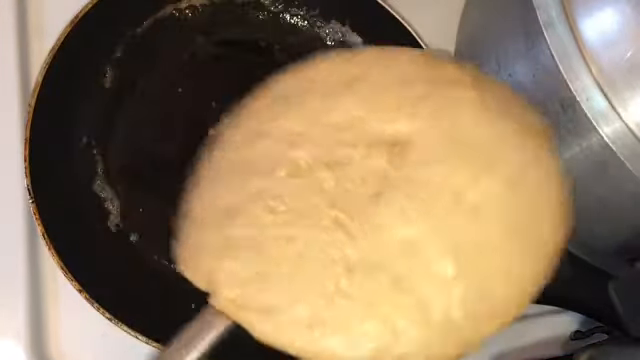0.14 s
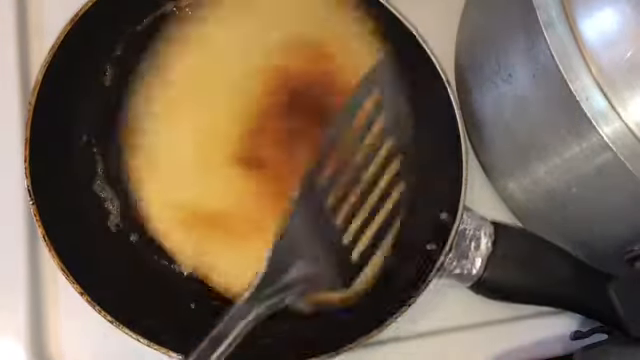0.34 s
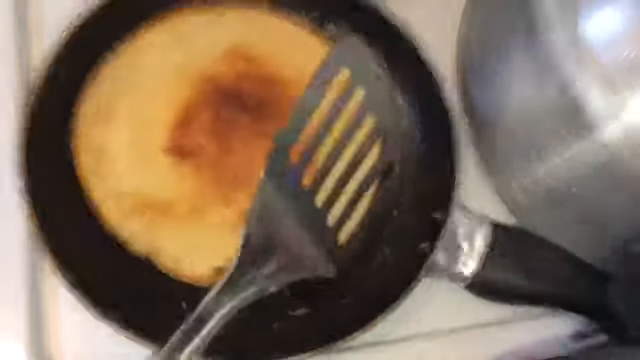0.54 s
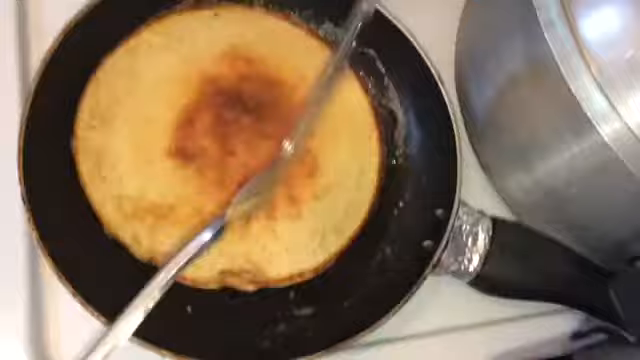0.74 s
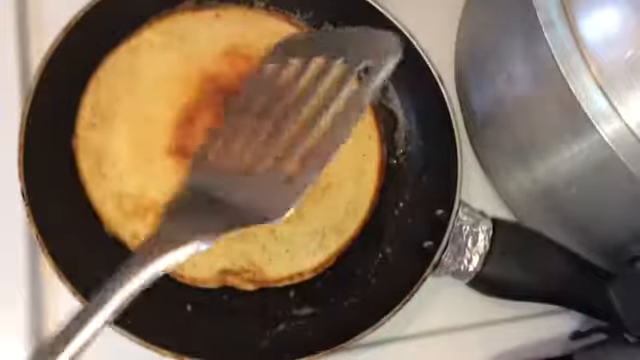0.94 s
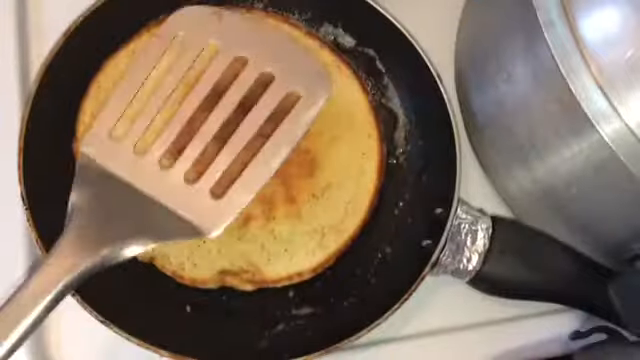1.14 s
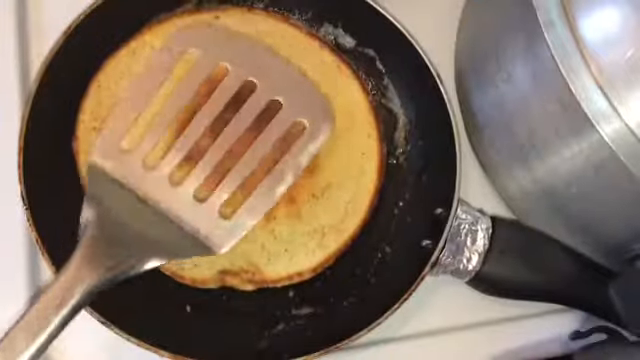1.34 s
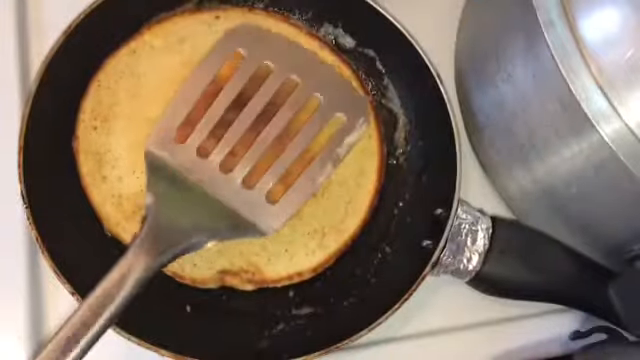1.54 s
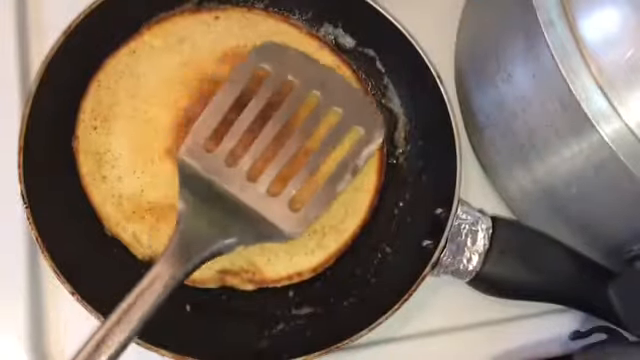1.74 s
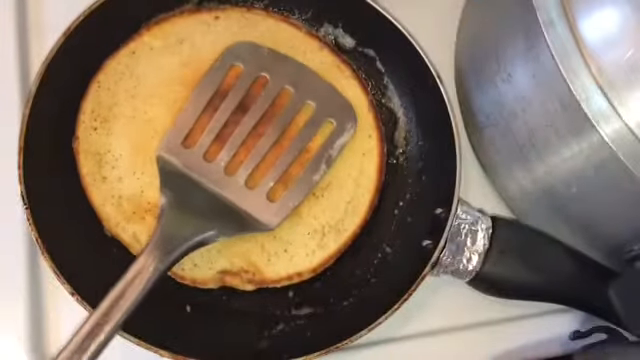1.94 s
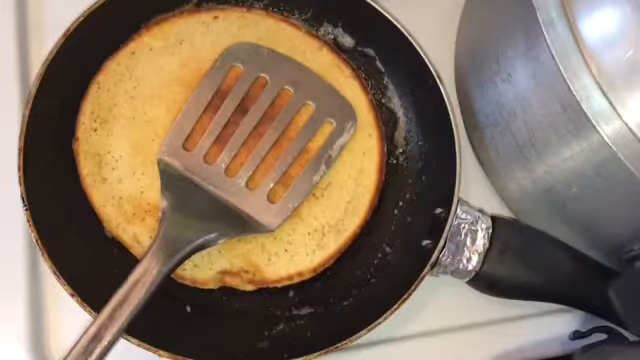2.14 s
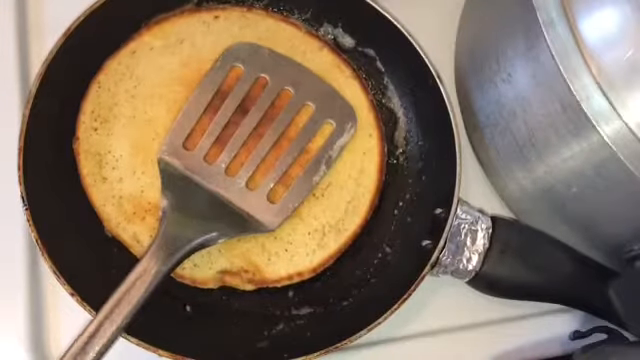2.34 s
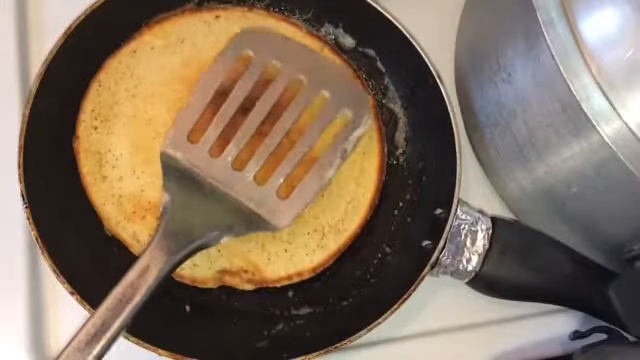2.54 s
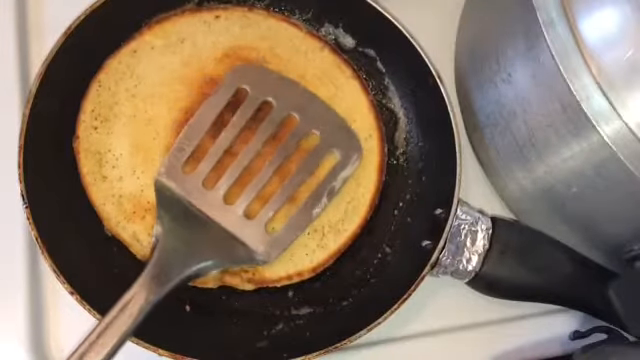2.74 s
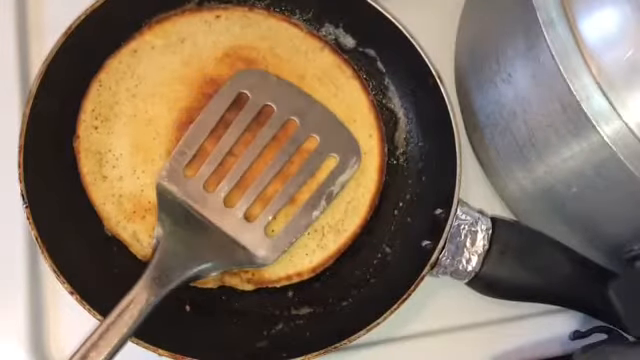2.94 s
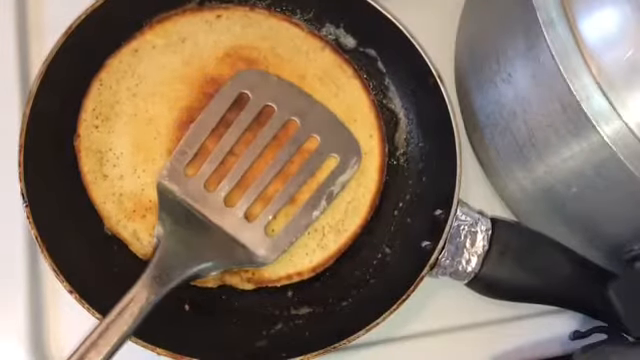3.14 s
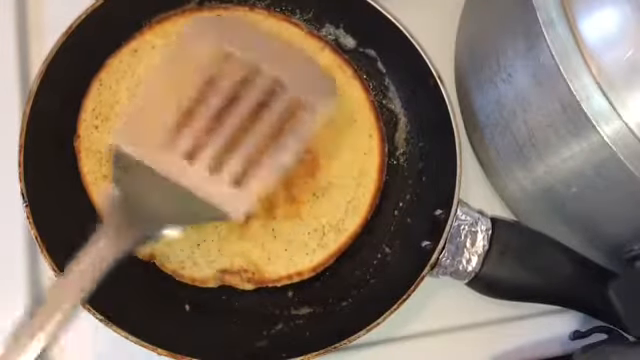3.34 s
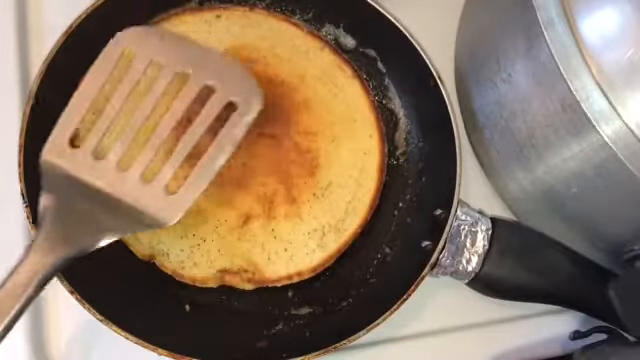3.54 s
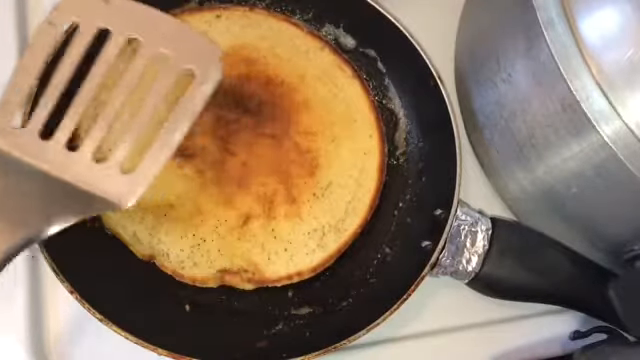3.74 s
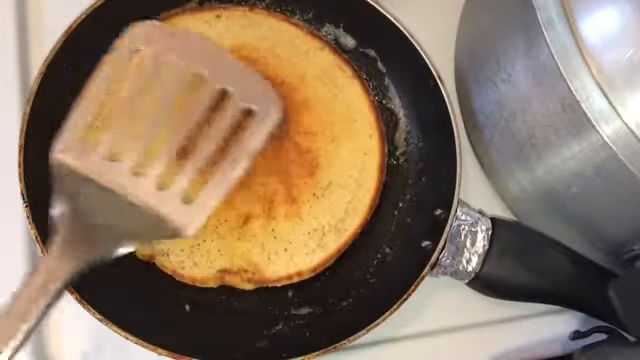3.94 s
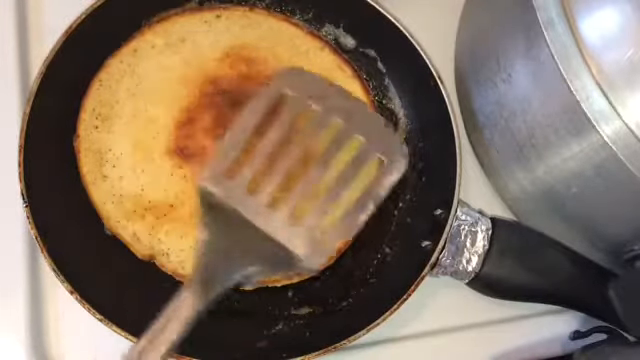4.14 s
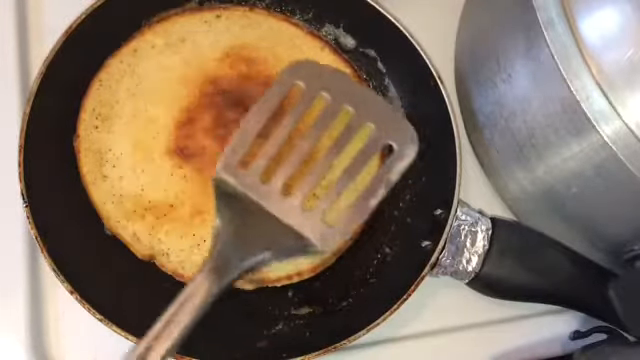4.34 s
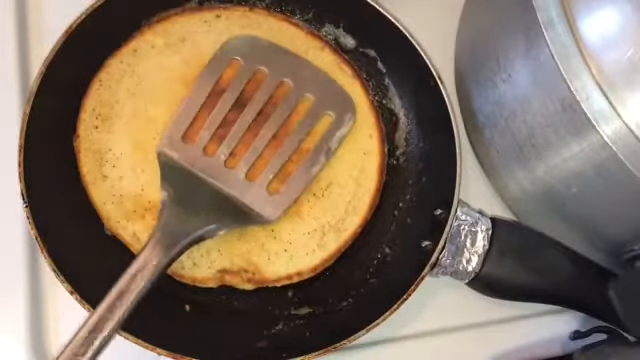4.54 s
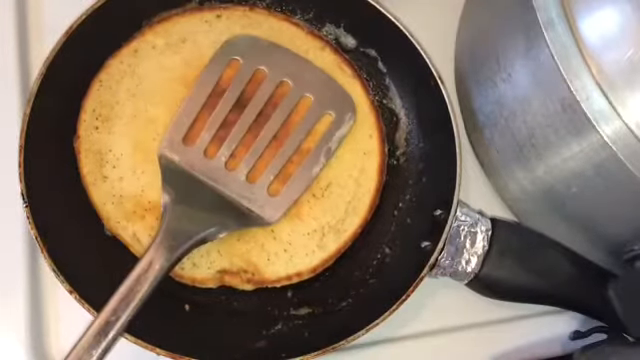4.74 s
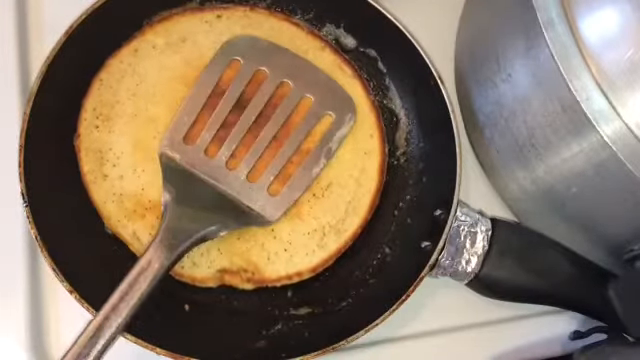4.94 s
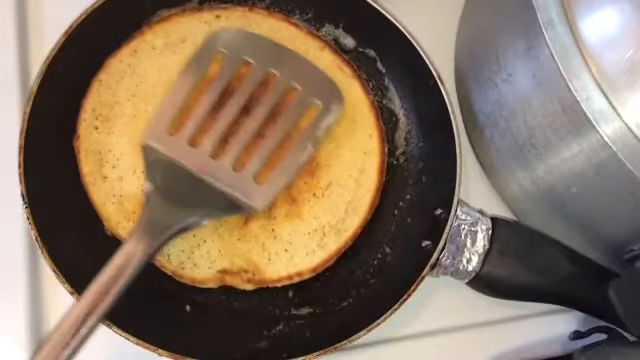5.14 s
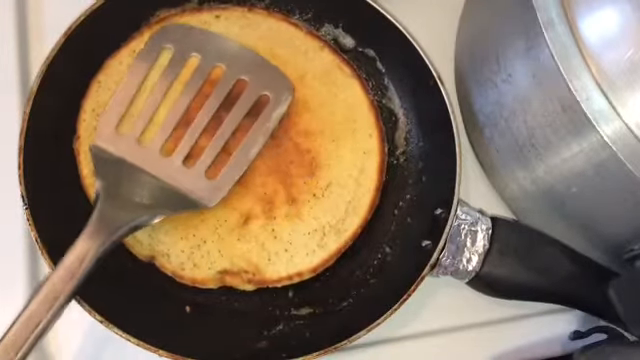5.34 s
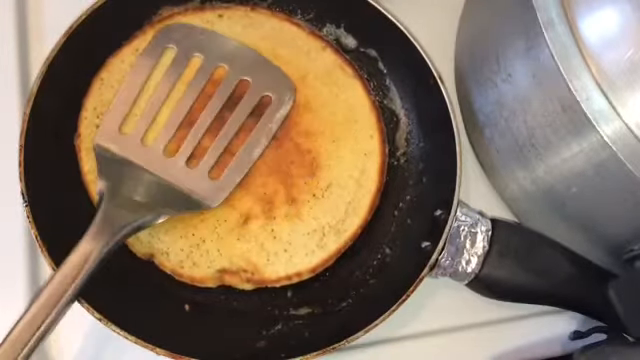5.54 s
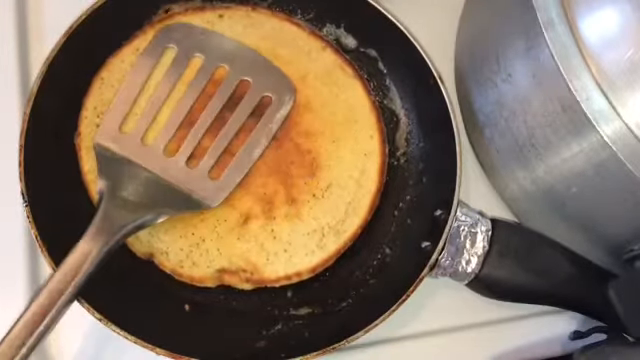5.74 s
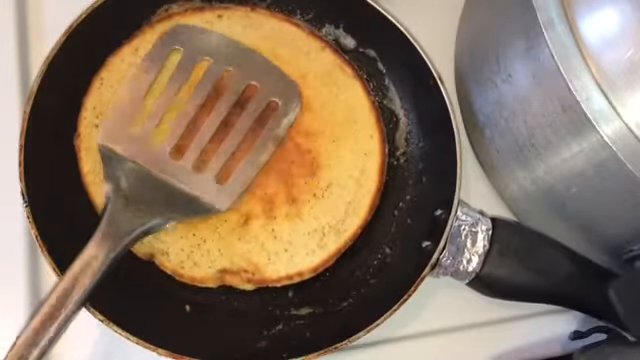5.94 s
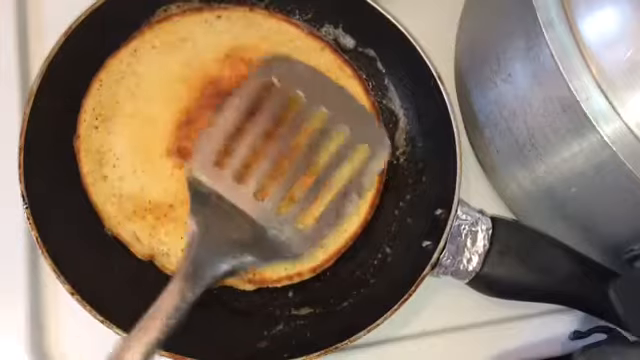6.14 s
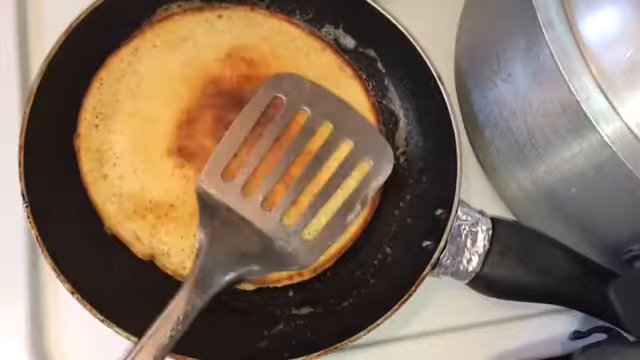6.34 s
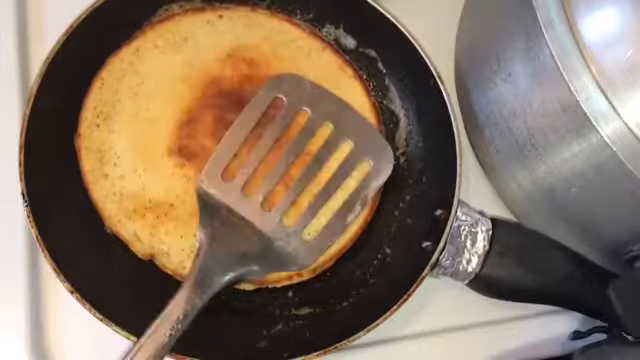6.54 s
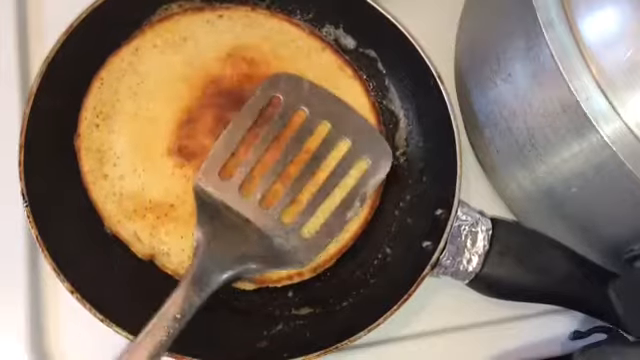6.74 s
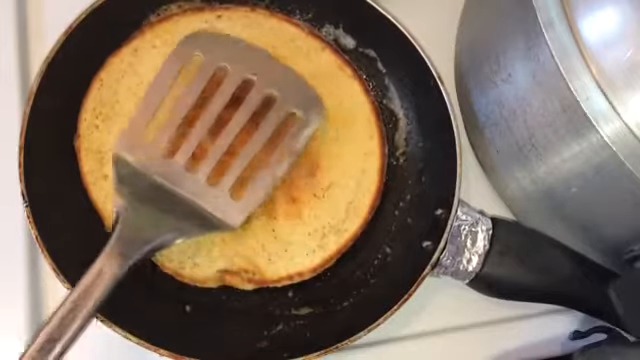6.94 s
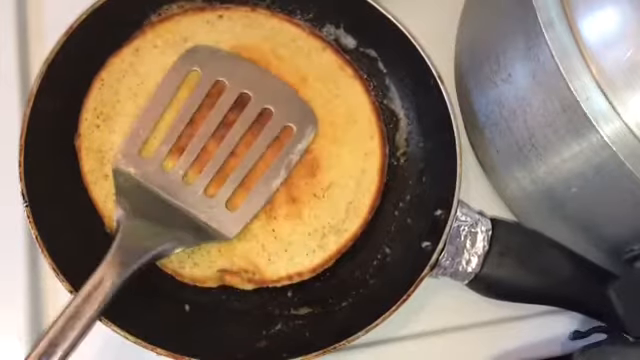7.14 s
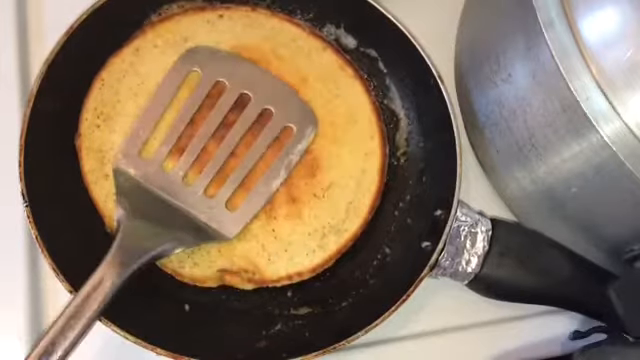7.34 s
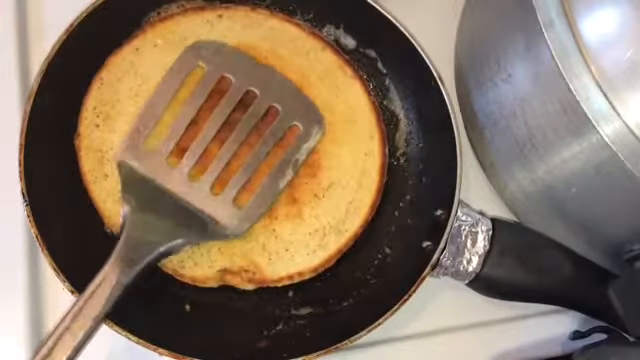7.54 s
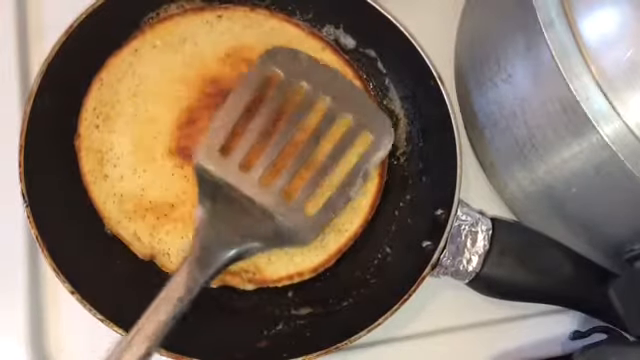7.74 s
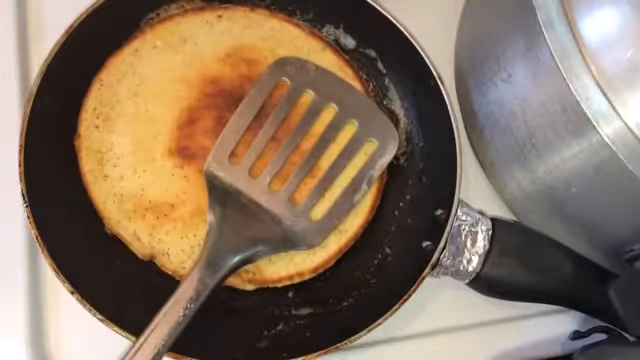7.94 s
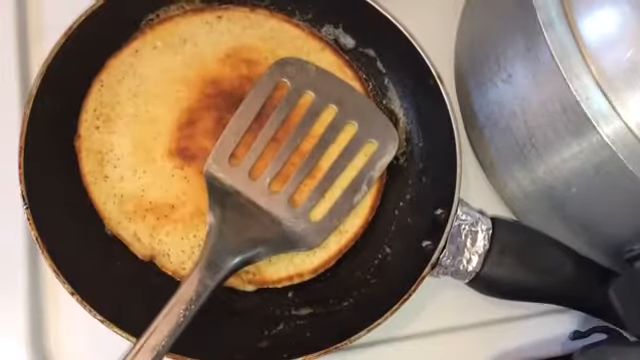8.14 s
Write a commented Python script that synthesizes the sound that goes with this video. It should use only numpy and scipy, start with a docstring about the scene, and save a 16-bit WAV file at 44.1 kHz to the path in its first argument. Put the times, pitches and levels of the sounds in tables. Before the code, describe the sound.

A pancake is flipped into a sizzling pan with a wet slap and metal clatter, then fries softly under spatula taps.

```python
"""A kitchen, close to a gas stove: a pancake is flipped in a non-stick pan and lands with a wet slap.
The pan clatters on its grate, and a slotted metal spatula pats and presses the cake, rocking the pan
and squeezing out steam. Bursting bubbles make the fresh batter sizzle and spit, then the frying settles.
Underneath, the flame rumbles softly and the gas jet whistles."""
import sys
import numpy as np
from scipy import signal
from scipy.fft import rfft, irfft
from scipy.io import wavfile

SR = 44100
rng = np.random.default_rng(int(sys.argv[2]) if len(sys.argv) > 2 else 0)


def master_out(mix):
    """Clip the mix to full scale and print it as 16-bit PCM to the path in sys.argv[1]."""
    frames = np.transpose(np.atleast_2d(mix))
    ceiling = np.clip(frames, -1, 1)
    pcm = np.round(ceiling * 32767).astype(np.int16)
    wavfile.write(sys.argv[1], SR, pcm)


N = 361380
TIME, FREQS = np.arange(N) / SR, np.fft.rfftfreq(N, 1 / SR)
WET_DB, DRY_DB = -51.5, -57.5  # how strongly wet and settled batter fry


def amp(db):
    """Turns decibels into a gain."""
    return 10 ** (np.asarray(db) / 20)


def unit(x):
    """Scales a signal to an average (rms) size of 1."""
    return x / np.sqrt(np.mean(x ** 2) + 1e-20)


def at_hz(points, hz):
    """Reads between rows of (frequency, value), on a scale of octaves."""
    f, value = np.transpose(points)
    return np.interp(np.log(hz + 1), np.log(f + 1), value)


def curve(points):
    """Joins rows of (time, value) with straight lines."""
    return np.interp(TIME, *np.transpose(points))


def add(mix, s, sound):
    """Mixes a sound in, starting at s seconds."""
    part = mix[max(round(s * SR), 0):][:len(sound)]
    part += sound[:len(part)]


def coloured(x, points):
    """Shapes a signal's bass and treble from rows of (frequency, level), at rms 1."""
    return unit(irfft(rfft(x) * amp(at_hz(points, FREQS)), N))


def drift(per_s):
    """Smooth random wandering; a higher per_s makes it quicker."""
    return unit(irfft(rfft(rng.standard_normal(N)) * np.exp(-(FREQS / per_s) ** 2), N))


def swell(t, rise_s, decay_s):
    """A level that grows to 1 at t = 0, then fades."""
    return np.exp(-abs(t) / np.where(t < 0, rise_s, decay_s))


def whistle(hz, width_hz):
    """Swirling gas stirs one resonance: noise gathered around a pitch."""
    band = 1 + ((FREQS - hz) / (width_hz / 2)) ** 2
    return unit(irfft(rfft(rng.standard_normal(N)) / band, N))


def burner():
    """The gas flame rushes and flutters, and its jet whistles faintly and unevenly."""
    # tone of the burner and kitchen background: f/Hz, level/dB
    rush_tone = [(20, -15), (45, -10.5), (65, -13), (88, 1), (115, -11), (148, 1), (175, -6.5),
                 (250, -18.5), (295, -6), (350, -19), (440, -11), (480, -20.5), (540, -8.5), (620, -21),
                 (850, -17.5), (1400, -21.5), (2300, -19), (3200, -29.5), (15000, -31)]
    # the flame's low flutter: t/s, level/dB
    flutter_levels = [(0, -67.5), (1.2, -64), (3, -62.5), (4.1, -67.5), (4.65, -56), (5.8, -83.5),
                      (6.5, -71), (8.19, -66)]
    # the jet's whistle: t/s, level/dB
    jet_levels = [(0, -70), (3.6, -72), (4.6, -67.5), (8.19, -69.5)]
    rush = amp(-62) * coloured(rng.standard_normal(N), rush_tone)
    waver_db = 3.5 * np.tanh(drift(7.8))
    jet = amp(curve(jet_levels) + waver_db) * whistle(hz=2080, width_hz=145)
    flutter = amp(curve(flutter_levels)) * whistle(hz=82, width_hz=30)
    return rush + flutter + jet


def splats():
    """Wet batter smacks the hot metal and throws a short spray."""
    # batter and oil hitting the pan: t/s, level/dB, rise/s, decay/s, centre/Hz, spread/octaves
    smacks = [(0.2494, -38.5, 0.0012, 0.055, 1880, 2.15), (0.276, -31.5, .011, 0.015, 4006, 2.1),
              (0.287, -28, 0.0041, 0.021, 1520, 1), (.289, -28.5, 0.0017, 0.029, 418, 1.7),
              (.298, -27, 0.0049, 0.025, 1136, 0.28), (0.355, -44, 0.00078, 0.013, 4900, 1.3),
              (0.408, -39, 0.001, 0.04, 1880, 2.1), (6.586, -54, .006, 0.0062, 6000, .5)]
    out, t = np.zeros(N), np.arange(SR // 4) / SR
    octave = np.log2(np.fft.rfftfreq(len(t), 1 / SR) + 1)
    for s, db, rise, decay, centre_hz, spread in smacks:
        band = 1 / (1 + ((octave - np.log2(centre_hz)) / spread) ** 2) ** 2
        spray = unit(irfft(rfft(rng.standard_normal(len(t))) * band, len(t)))
        envelope = np.minimum(t / rise, 1) * np.exp(-np.maximum(t - rise, 0) / decay)
        add(out, s, amp(db) * spray * envelope)
    return out


def frying(land_s=.25, land_db=-66, build_s=.22, dry_at_s=1.75, settle_s=.33):
    """Frying strength in dB: it builds as the cake lands, holds while the batter is wet, then settles."""
    # brief swells in the sizzle's loudness: peak t/s, boost/dB, half length/s
    swells = [(1.69, 3.5, 0.065), (2.09, 3, 0.04), (2.56, 1, 0.085), (3.9, 2.5, 0.03), (4.498, 1.8, 0.082),
              (6.579, 2.5, 0.066), (8.17, 1.5, 0.17)]
    building = (land_db - WET_DB) * np.exp(-np.maximum(TIME - land_s, 0) / build_s)
    settling = (DRY_DB - WET_DB) * (1 - np.exp(-np.maximum(TIME - dry_at_s, 0) / settle_s))
    swelling = sum(db * np.exp(-((TIME - s) / length) ** 2) for s, db, length in swells)
    return np.where(TIME < land_s, -100, WET_DB + building + settling + swelling)


def crackle(per_s, spread_db, pitches=14, decay_cycles=.82):
    """Tiny bubbles burst at random, each a very short ping of its own pitch and size."""
    out, t = np.zeros(N), np.arange(96) / SR
    count = max(int(per_s * N / SR / pitches), 1)
    for hz in np.geomspace(3500, 15000, pitches):
        when, luck = rng.random((count, 2)).T
        size = np.minimum(-np.log(1 - luck), 3.3)  # many small, few large
        clicks = np.bincount((when * N).astype(int), amp(spread_db * size), N)
        ping = np.sin(2 * np.pi * hz * t) * np.exp(-t * hz / decay_cycles)
        out += np.convolve(clicks, ping)[:N] * np.sqrt(hz)
    return unit(out)


def sizzle(fresh_db=-48, settled_db=-57):
    """A wash of countless bubbles with clusters of nearer snaps on top; livelier frying is brighter."""
    # fizz of fresh batter: f/Hz, level/dB
    fresh_tone = [(500, -8), (2000, -16), (4200, -15), (5500, -5), (7000, 3), (9500, -4), (13000, 3.5),
                  (15500, -1.5)]
    # fizz of settled batter: f/Hz, level/dB
    settled_tone = [(500, -6), (1500, -5), (2800, -3), (4400, -8.5), (5500, -1), (6500, 2), (9500, -3),
                    (12500, 0.5), (15500, -3)]
    level_db = frying() + .3 * drift(3.2)
    flicker = drift(33)
    fizz, snaps = crackle(per_s=1300, spread_db=6.5), crackle(per_s=150, spread_db=6)
    wash = amp(1.5) * rng.standard_normal(N) + amp(-5) * fizz
    clusters = unit(snaps * amp(3 * np.tanh(flicker)))
    bubbles = wash * amp(1.38 * flicker) + amp(-6) * clusters
    fresh = np.clip((level_db - settled_db) / (fresh_db - settled_db), 0, 1)
    blend = fresh * coloured(bubbles, fresh_tone) + (1 - fresh) * coloured(bubbles, settled_tone)
    return amp(level_db + 2.5) * blend


def small_pops(wet_per_s=32, dry_per_s=6, above_frying_db=24.5):
    """Smaller random bubbles that follow the frying in rate and size: rows of t/s, level/dB, f/Hz."""
    level_db = frying()
    wet = np.clip((level_db - DRY_DB) / (WET_DB - DRY_DB), 0, 2)
    per_s = dry_per_s + wet * (wet_per_s - dry_per_s)
    at = np.flatnonzero(rng.random(N) < per_s / SR)
    size, pitch = rng.standard_normal((N, 2))[at].T
    return list(zip(TIME[at], level_db[at] + above_frying_db + 2 * size, 10700 * 2 ** (.14 * pitch)))


def pops(decay_cycles=.77, lead_s=.006):
    """A bubble of fat fizzes open, snaps and throws a brief spit."""
    # the largest bursting bubbles: t/s, level/dB, f/Hz
    big_pops = [(1.0675, -20, 11160), (1.1813, -20, 9000), (1.4702, -19.5, 11300), (1.5117, -17.5, 9900),
                (1.5796, -22, 10400), (1.6042, -19.5, 10100), (1.6085, -18.5, 9500), (1.671, -16.5, 8900),
                (1.6817, -18, 10900), (1.7233, -13, 9800), (1.74, -18, 9050), (1.769, -21, 12100),
                (1.7817, -20, 9850), (1.8144, -22.5, 9430), (1.8776, -21, 11200), (2.084, -20.5, 11700),
                (2.2296, -23.5, 9900), (2.4865, -23.5, 7400), (2.615, -20, 9700), (2.8158, -21.5, 9100),
                (3.0338, -24, 8100), (3.3602, -17.5, 10500), (3.5475, -27.5, 6160), (3.5971, -19.5, 10800),
                (4.5494, -27.5, 10100), (4.7542, -27.5, 10700), (5.2939, -29.5, 10300),
                (5.411, -31.5, 7000), (5.6389, -21, 7140), (5.7392, -25.5, 8100), (6.0455, -23, 11500),
                (6.5876, -27, 10000), (7.472, -27.5, 10950), (7.729, -26, 10900), (7.7786, -24.5, 9820)]
    out, t = np.zeros(N), np.arange(640) / SR - lead_s
    for s, db, hz in big_pops + small_pops():
        cycles = hz * np.maximum(t, 0)
        snap = np.sin(2 * np.pi * cycles) * np.exp(-cycles / decay_cycles) * (1 - np.exp(-2 * cycles))
        bright_noise = np.diff(rng.standard_normal(len(t) + 1)) / 2
        spit = bright_noise * swell(t, rise_s=.00054, decay_s=.001436)
        add(out, s - lead_s, amp(db - 1) * (snap / abs(snap).max() + amp(-17) * spit))
    return out


def thumps():
    """The falling cake traps a cushion of air, and the stove top booms under heavy blows."""
    # heavy pushes of cake and pan on the stove: t/s, level/dB, f/Hz, rise/s, decay/s
    pushes = [(.269, -17.5, 164, .007, 0.017), (0.29, -5.5, 169, 0.0027, 0.011),
              (.447, -18.5, 88.7, 0.0089, 0.038), (.487, -17, 88.5, .008, 0.039),
              (0.582, -23, 88.5, .01, 0.055), (0.832, -25, 156.2, .005, 0.034),
              (1.132, -24.5, 170.7, 0.004, 0.03), (5.53, -36, 160, 0.0098, .022)]
    out, t = np.zeros(N), np.arange(SR // 2) / SR
    for s, db, hz, rise, decay in pushes:
        envelope = np.exp(-t / decay) * (1 - np.exp(-t / rise))
        add(out, s, -amp(db) * np.sin(2 * np.pi * hz * t) * envelope)
    return signal.lfilter(*signal.butter(2, 55, "high", fs=SR), out)


def kitchen_ring(time_scale, size=16384):
    """The stove top and kitchen ring on as a blur of noise, the treble dying first."""
    # how long they ring at time_scale 1: f/Hz, time to fade by 60 dB/s
    ring_times = [(100, 0.7), (260, 0.284), (700, 0.42), (1800, 0.24), (5000, 0.25), (15000, 0.18)]
    hz, t, bands = signal.stft(rng.standard_normal(size), SR, nperseg=256)
    fade_s = time_scale * at_hz(ring_times, hz)[:, None]
    equal_energy = np.sqrt(2 * np.log(1000) / (fade_s * SR))
    return signal.istft(bands * amp(-60 * t / fade_s) * equal_energy, SR, nperseg=256)[1][:size]


def pulse(points, size=4096):
    """The sharpest click with the given tone that makes no sound before it starts."""
    log_gain = np.log(amp(at_hz(points, abs(np.fft.fftfreq(size, 1 / SR)))))
    return np.fft.ifft(np.exp(np.conj(signal.hilbert(log_gain)))).real[:size // 2]


def metal_chirp(click, delay_at_1khz_s=.001817):
    """High pitches travel faster through thin, bending metal, so a click spreads into a tiny chirp."""
    hz = np.fft.rfftfreq(2 * len(click), 1 / SR)
    phase = 4 * np.pi * delay_at_1khz_s * np.sqrt(1000 * hz)
    return irfft(rfft(click, 2 * len(click)) * np.exp(-1j * phase))[:len(click)]


def blow(thud_db, clang_db, tick_db):
    """The push of one hit: its weight is in the bass, its hardness in the treble."""
    bass = [(25, thud_db - 16), (65, thud_db - 15), (105, thud_db - 8), (165, thud_db),
            (290, thud_db / 2 - 2)]
    middle = [(450, 0), (620, 0)]
    treble = [(850, clang_db * .71), (1700, clang_db), (2600, (clang_db + tick_db) / 2 - 2),
              (6000, tick_db), (15000, tick_db - 13.5)]
    return metal_chirp(pulse(bass + middle + treble))


def rocking(thud_db, clang_db, tick_db, rebound_db, gap_s=.035, fall_db=-5.5, dull_db=-10.5):
    """After a blow the pan rocks back on its grate twice, weaker and duller than the blow."""
    force = np.zeros(8192)
    add(force, 0, blow(thud_db, clang_db, tick_db))
    rebound = blow(thud_db, clang_db + dull_db, tick_db + dull_db)
    for k in range(2):
        add(force, (k + 1) * gap_s, amp(rebound_db + k * fall_db) * rebound)
    return force


def contact(chatter_s=.004, split_hz=1000, size=512):
    """A knock with no ring: one clean push in the bass, a moment of metal chatter in the treble."""
    chatter = rng.choice([-1., 1.], size) * np.exp(-np.arange(size) / SR / chatter_s)
    chatter /= np.linalg.norm(chatter)
    push = signal.lfilter(*signal.butter(2, split_hz, fs=SR), signal.unit_impulse(size))
    return push + signal.lfilter(*signal.butter(2, split_hz, "high", fs=SR), chatter)


def knocks(room_rise_s=.0044):
    """Each blow makes a knock, rings the pan, rattles the stove top and echoes in the room."""
    # spatula hitting pan and pan hitting grate: t/s, strength at 500 Hz/dB,
    # then, relative to that strength: thud/dB, clang/dB, tick/dB, first rebound/dB
    hits = [(.428, 17, 4.5, 6.5, -7.5, -22), (0.4413, 18.5, 0, -4, -11.5, -14), (.452, 19, 10, -5, -25, -9),
            (0.468, 22, -4, -6, -20, -22), (0.4762, 23, -3, -1, -14.5, -25),
            (.491, 15, 11.5, -12, -19, -10), (.508, 21.5, 5, -9, -23, -25),
            (0.5192, 15, 11.5, -2.5, -12, -22), (.576, 12, -2, -5, -14, -15),
            (.5832, 23, -3.5, -7.5, -15, -16), (0.6214, 4.5, 7, 1, -3, -17), (.655, 10, -2, -7, -28, -20),
            (.681, 4, -4, 2.5, -9.5, -17), (0.7106, 10.5, 4.5, 1, -7, -15),
            (0.8293, 20.5, -5, -3.5, -25, -8.5), (.942, 4.5, 8, -24, -27, -20),
            (1.094, -2, -3, -11, -19, -18), (1.131, 14, 6, -11, -31.5, -5.5),
            (1.381, 10.5, 4, -18, -47, -10), (1.619, 1, 2, -35, -44, -17), (1.965, -7.5, 11, -5, -20, -19),
            (2.835, -17, -1, -0.5, -26, -20), (3.109, 0.5, 10, -18, -30, -16),
            (4.598, -4, 10.5, -11.5, -24, -22), (4.751, 4, -1, -26, -25, -16),
            (5.374, -11.5, 14, -9, -10, -15), (5.526, 4.5, 6.5, -17.5, -29, -17),
            (6.249, -16, 0, -2.5, -11, -20), (7.064, -3.5, 9.5, -19.5, -23, -21),
            (7.299, -2, -11, -16, -26, -18)]
    # ringing notes of the pan, damped by the cake: f/Hz, level/dB, time to fade by 60 dB/s
    pan_notes = [(173.1, 3.5, 0.12), (224.7, 4, 0.24), (410, 7, 0.13), (460, 6.5, 0.068), (566, 8, 0.076),
                 (615, 3.5, 0.2), (702, 3.5, .2), (747.4, 5, .2), (847, 2, .1), (927, 9.5, .18),
                 (1111, 10.5, 0.22), (1298, 5, 0.2), (1690, 5, 0.13), (1730, 7.5, 0.11), (1836, 6, 0.1315),
                 (2610, 10, .2), (2870, 3, 0.095), (3184, 6, .12), (5340, 6.5, 0.073), (6670, 6.5, .12)]
    room = amp(-8) * kitchen_ring(time_scale=1)
    out, t = np.zeros(N), np.arange(len(room)) / SR
    room *= 1 - np.exp(-t / room_rise_s)
    for s, db, thud_db, clang_db, tick_db, rebound_db in hits:
        stove_top = amp(-8) * kitchen_ring(time_scale=.32)
        ring = room + stove_top
        # luck stands for where the blow lands, which sets how strongly each note rings
        for (hz, note_db, fade_s), luck in zip(pan_notes, rng.standard_normal(len(pan_notes))):
            rate = np.log(1000) / fade_s
            gain = amp(note_db - 3 + 2 * luck) * 2 * rate / SR
            ring += gain * np.exp(-rate * t) * np.cos(2 * np.pi * hz * t + luck)
        add(ring, 0, amp(-2) * contact())
        force = rocking(thud_db, clang_db, tick_db, rebound_db)
        add(out, s - .0008, amp(db) * signal.fftconvolve(force, ring))
    return out


def clinks(pitch_spread=.13, bars=6, rise_s=.00011):
    """The bars between the spatula's slots ring at neighbouring pitches."""
    # touches of the steel blade's edge: t/s, level/dB, f/Hz, decay/s
    touches = [(0.6805, -29, 3220, .009), (0.7091, -32.5, 3320, 0.022), (1.094, -49, 3030, 0.011),
               (4.7495, -32.5, 2360, 0.0024), (4.751, -43, 3620, 0.0041), (6.594, -49, 5670, .006),
               (7.065, -51, 5560, .004), (7.298, -34.5, 2217, 0.0057)]
    out, t = np.zeros(N), np.arange(SR // 6) / SR
    for s, db, hz, decay in touches:
        offsets = np.linspace(-1, 1, bars) + .05 * rng.standard_normal(bars)
        bar_hz = hz * (1 + pitch_spread * offsets)
        ring = np.sin(2 * np.pi * (bar_hz[:, None] * t + rng.random((bars, 1)))).sum(0)
        add(out, s, amp(db) * unit(ring) * np.exp(-t / decay) * (1 - np.exp(-t / rise_s)))
    return out


def steam(rise_s=.027):
    """Steam wheezes out through a narrow gap, each puff swelling fast and dying away."""
    # puffs squeezed out from under the cake: peak t/s, level/dB, decay/s
    puffs = [(.8, -43.5, .08), (1.09, -58, 0.05), (1.37, -59, .025), (1.775, -51.5, 0.16)]
    flow = sum(amp(db) * swell(TIME - s, rise_s, decay) for s, db, decay in puffs)
    return flow * whistle(hz=1790, width_hz=230)


def presses():
    """Pressing through the soft cake, the blade only makes the pan grumble."""
    # the flat blade pressing and rubbing the cake: peak t/s, level/dB, decay/s
    rubs = [(1.654, -51.5, 0.081), (2.075, -50.5, 0.053), (2.182, -45.5, 0.01), (2.256, -50.5, 0.038),
            (3.247, -55, 0.015), (5.938, -54, 0.027), (6.444, -49, 0.041), (6.614, -43, 0.027),
            (6.702, -47.5, 0.035), (7.2, -51.5, 0.032), (7.506, -53.5, 0.034)]
    # dull tone of a press: f/Hz, level/dB
    dull_tone = [(60, -41), (130, -3), (195, 5.5), (290, -21), (400, -8.5), (570, -9), (800, -33),
                 (2000, -23), (8000, -64)]
    weight = sum(amp(db) * swell(TIME - s, decay / 3, decay) for s, db, decay in rubs)
    return weight * coloured(rng.standard_normal(N), dull_tone)


def scene():
    """Everything on the stove, heard from just above the pan."""
    spits, booms = pops(), thumps()
    echo = signal.fftconvolve(amp(-12) * spits + amp(-15) * booms, kitchen_ring(time_scale=.62))[:N]
    handling = splats() + booms + knocks() + clinks() + presses()
    return (handling + sizzle() + spits + echo + steam() + burner())[None]


def record(dry, cutoff_hz=15450):
    """Cuts away the very highest treble."""
    low_pass = signal.firwin(255, cutoff_hz, window=("kaiser", 8), fs=SR)
    return signal.oaconvolve(dry, low_pass[None], "same")


dry = scene()
out = record(dry)
master_out(out)
```